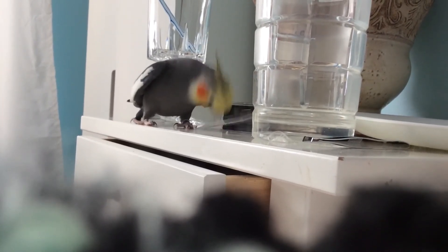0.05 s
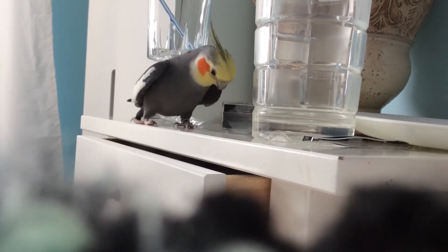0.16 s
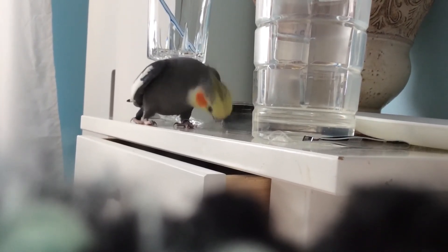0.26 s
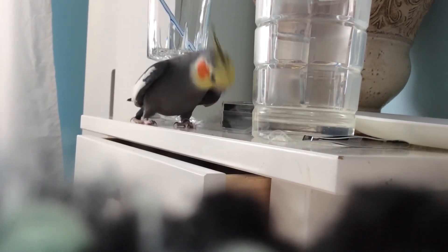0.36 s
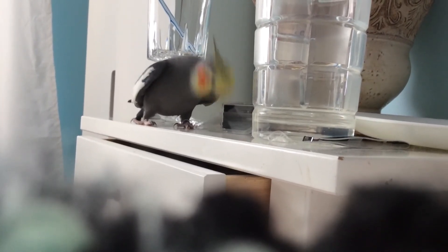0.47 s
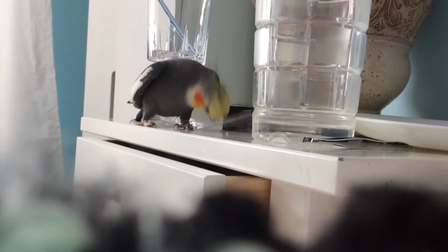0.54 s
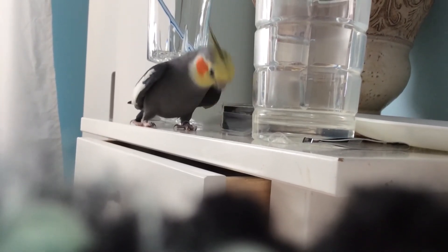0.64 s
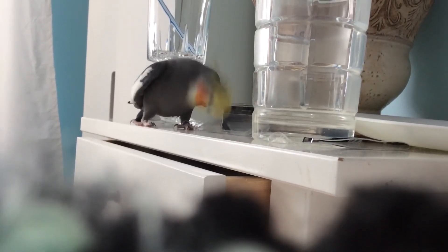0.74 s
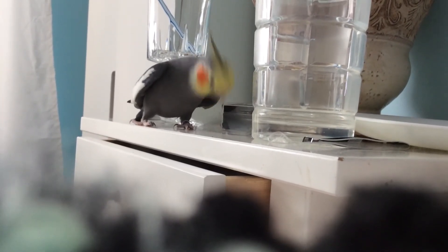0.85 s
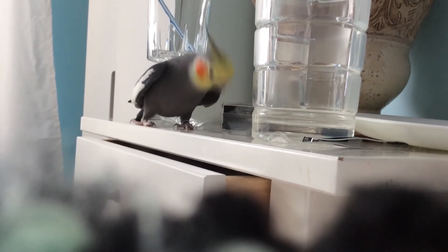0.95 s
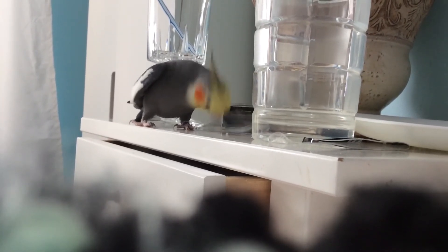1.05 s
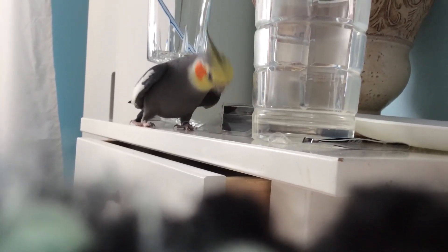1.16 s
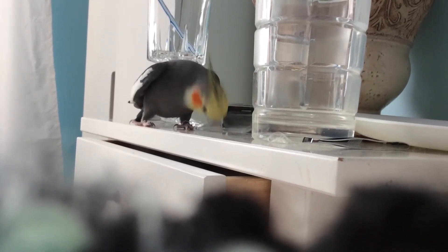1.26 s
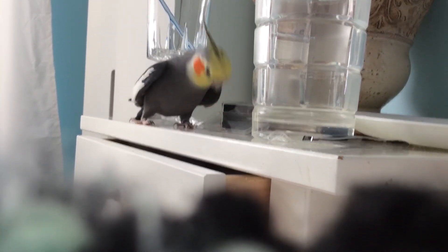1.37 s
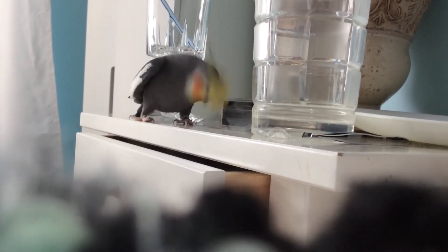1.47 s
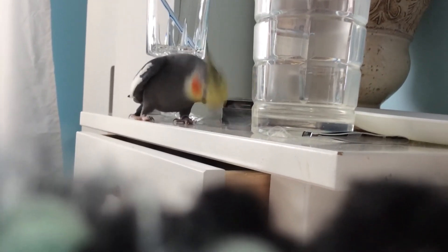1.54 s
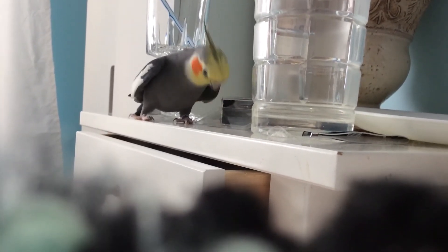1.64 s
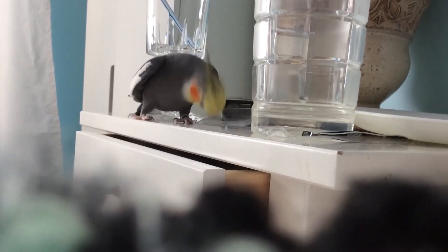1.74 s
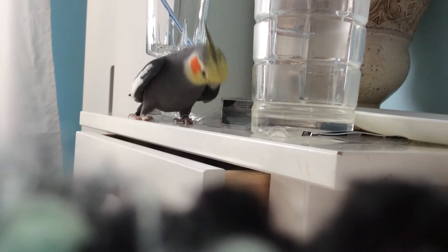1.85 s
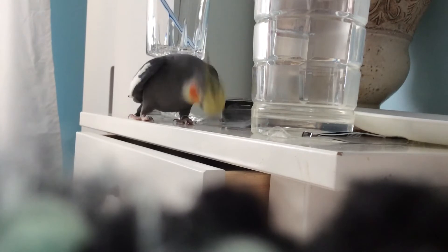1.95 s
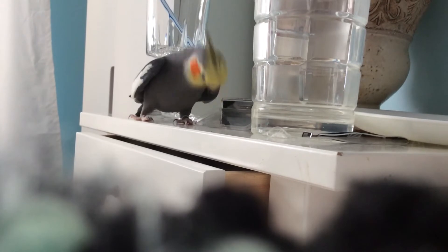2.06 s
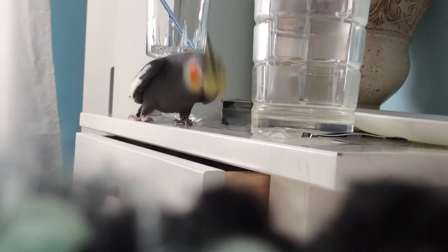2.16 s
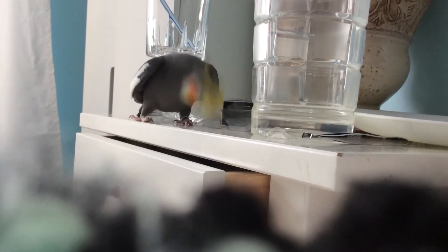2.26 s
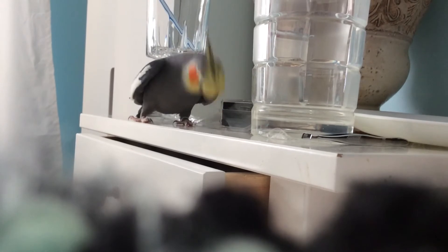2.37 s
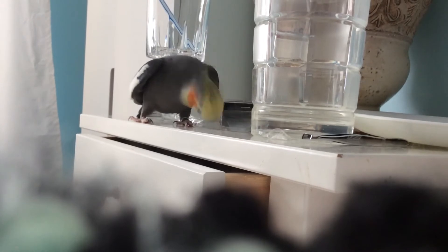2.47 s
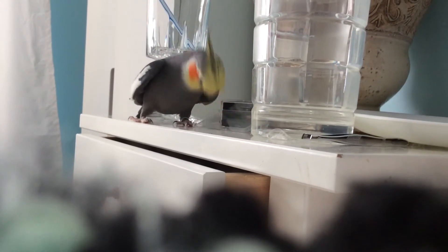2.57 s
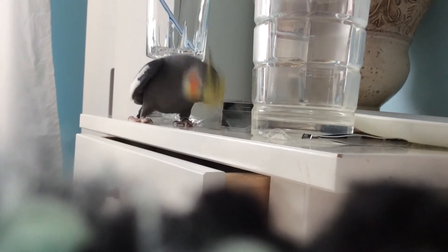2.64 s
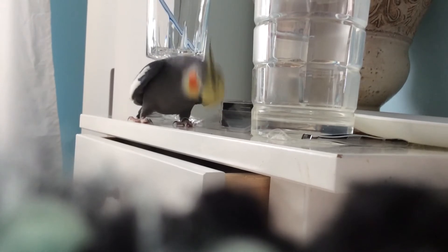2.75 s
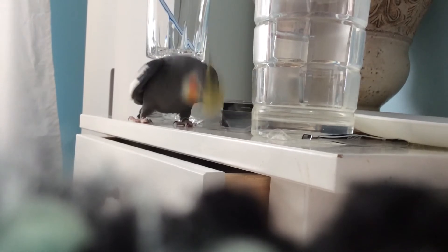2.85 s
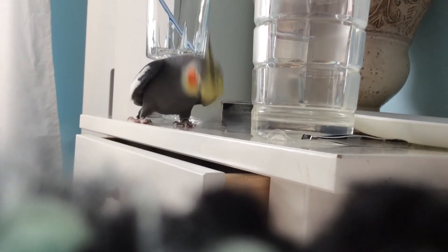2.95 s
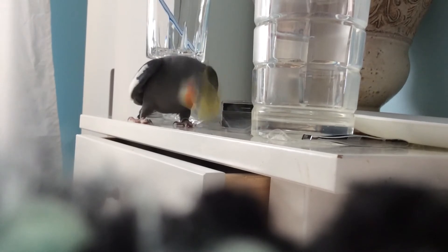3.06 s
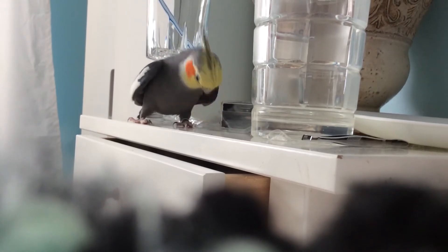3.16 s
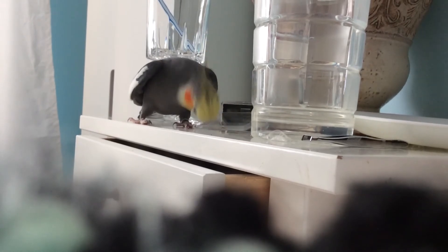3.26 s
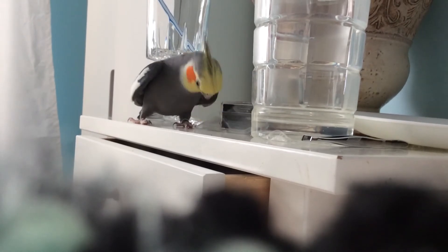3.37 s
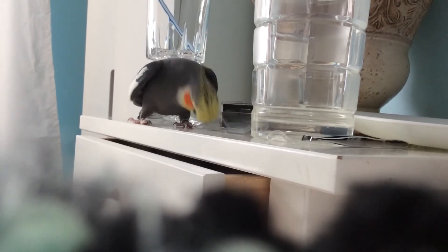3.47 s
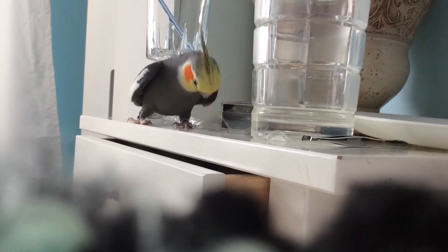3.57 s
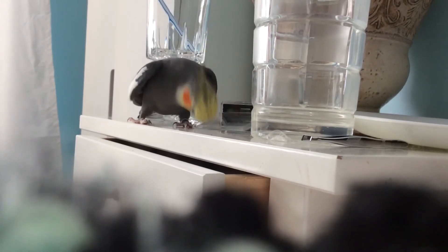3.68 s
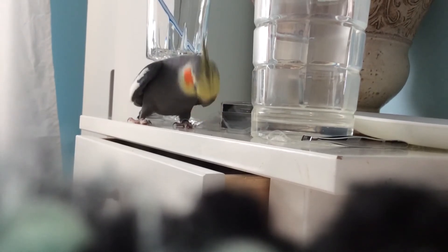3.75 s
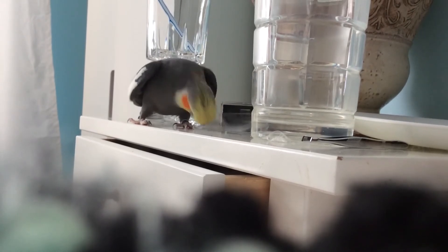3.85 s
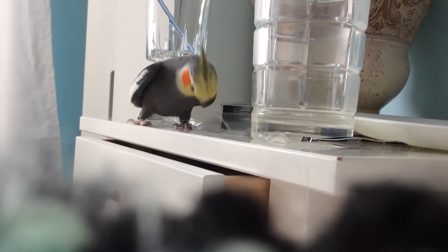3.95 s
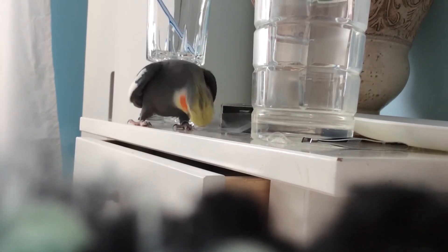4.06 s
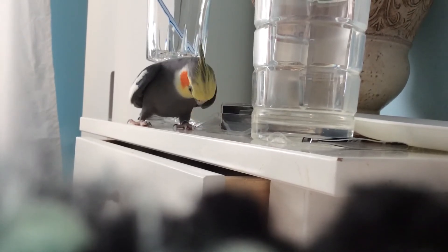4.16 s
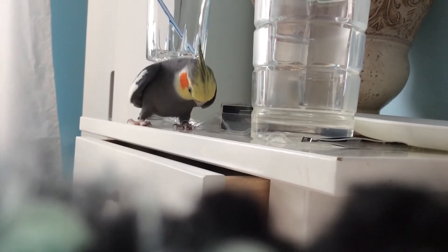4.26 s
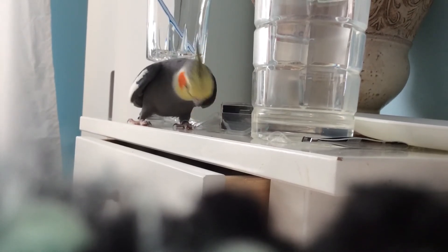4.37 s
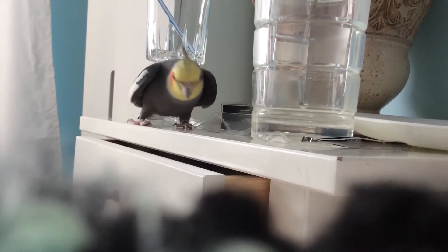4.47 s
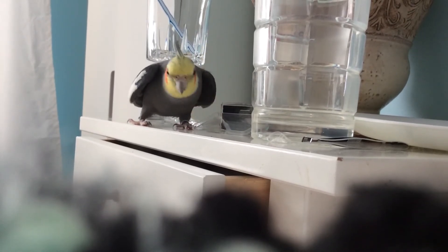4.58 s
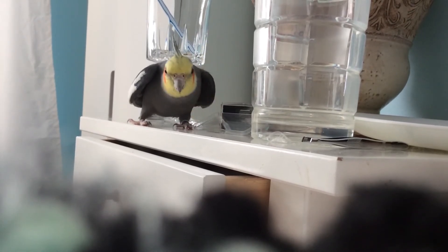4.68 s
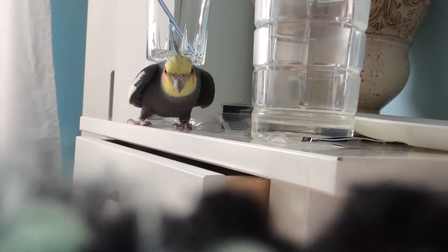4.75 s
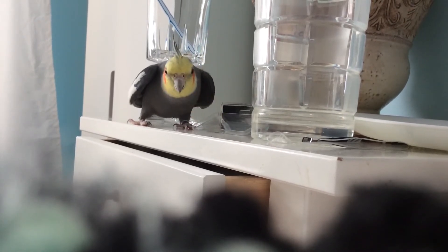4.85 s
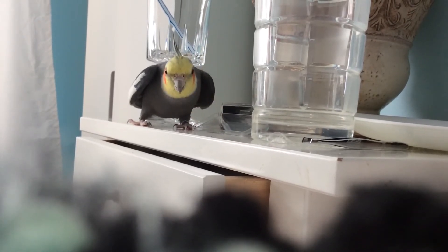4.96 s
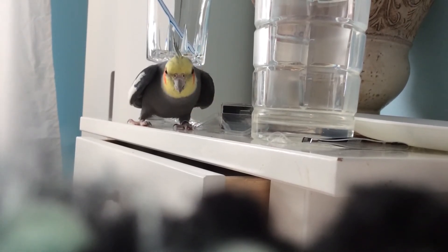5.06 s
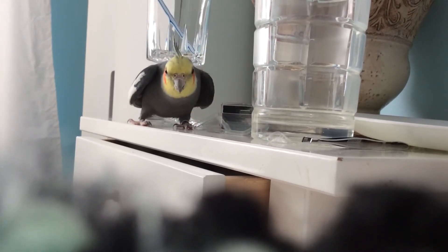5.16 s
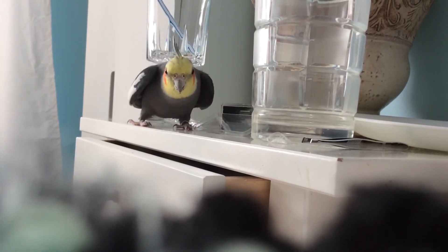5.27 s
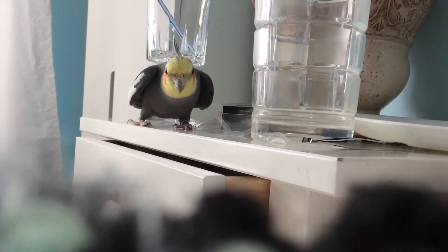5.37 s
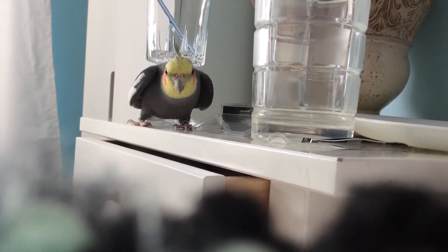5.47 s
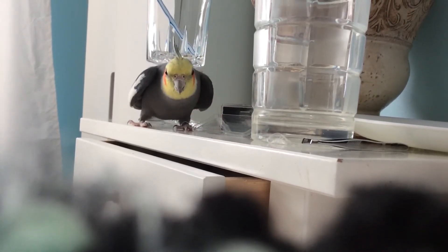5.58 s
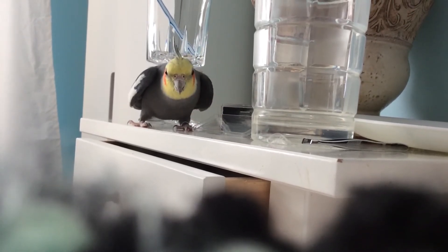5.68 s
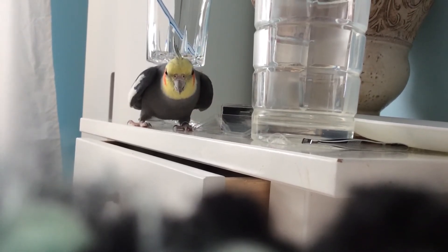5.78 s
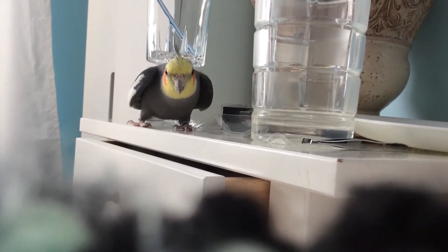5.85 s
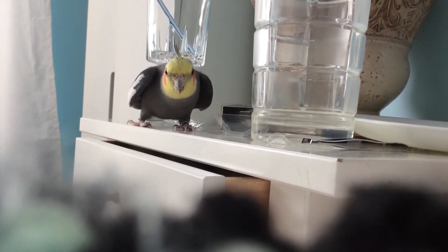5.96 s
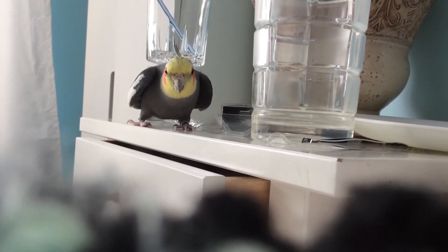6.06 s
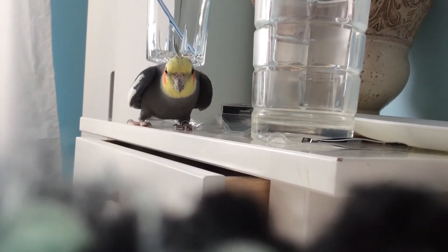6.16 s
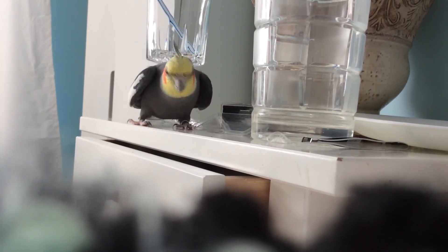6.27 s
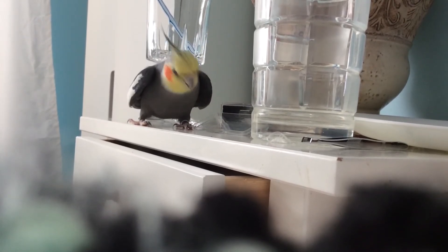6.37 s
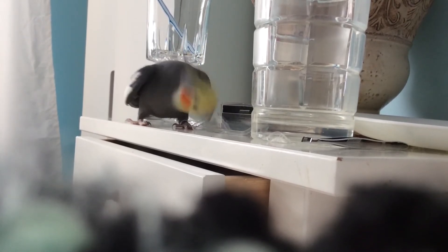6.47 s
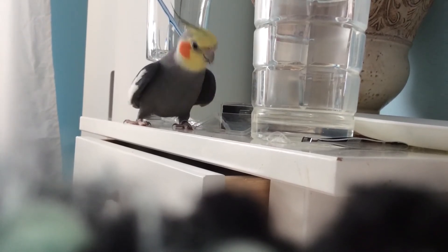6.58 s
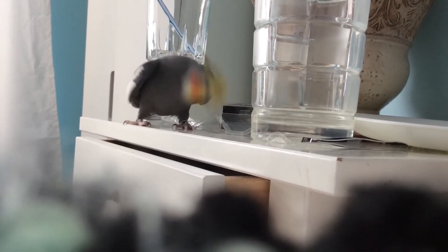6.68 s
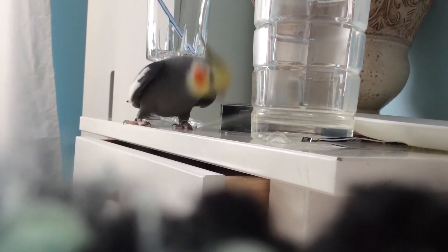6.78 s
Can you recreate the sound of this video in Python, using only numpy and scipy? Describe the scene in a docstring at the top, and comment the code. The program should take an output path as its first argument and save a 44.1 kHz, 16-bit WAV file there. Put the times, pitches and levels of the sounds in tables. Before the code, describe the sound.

A small parrot raps a loose plastic pot on a hollow chest top in steady sharp knocks with rattling rebounds, pauses, then strikes once more over fan hum.

```python
"""First heard are a fan's hum and the last of a plastic buzz; then a small parrot hammers a loose plastic pot
on a hollow chest of drawers. Each blow excites short damped modes: a beak tick, a scrape, and a second knock as
the pot meets the top. The pot buzzes by repeated micro-impacts, rocks back and lands with a modal ring.
Shaped noise gives the faint rustles of the shifting bird and the rush of air, over which fluttering sinusoids
make the motor hum; sparse pings are single wall modes, and a diffuse decaying tail is the room."""
import sys
import numpy as np
from scipy import signal
from scipy.fft import rfft, irfft
from scipy.io import wavfile
from scipy.ndimage import uniform_filter1d

SR = 44100
rng = np.random.default_rng(int(sys.argv[2]) if len(sys.argv) > 2 else 0)


def convert_level_to_amplitude(level_db):
    """Map a level in decibels to its linear amplitude factor."""
    exponent = np.asarray(level_db, float) / 20
    return 10 ** exponent


def waveform_to_disk(signal):
    """Save audio, clipped to [-1, 1], as 16-bit WAV at the path in sys.argv[1]."""
    frames = np.transpose(np.atleast_2d(signal))
    scaled = np.clip(frames, -1, 1) * 32767
    samples = np.round(scaled).astype(np.int16)
    wavfile.write(sys.argv[1], SR, samples)


N = 300762  # length [samples]


def level(x, db):
    """Energy scaling: set the rms level."""
    return x * convert_level_to_amplitude(db) / np.sqrt(np.mean(x ** 2))


def peak(x, db):
    """Amplitude scaling: set the peak level."""
    return x * convert_level_to_amplitude(db) / np.max(np.abs(x))


def add(out, s, x):
    """Linear superposition: mix a short sound in at time s."""
    i = int(s * SR)
    out[i:i + len(x)] += x[:len(out) - i]


def onset(length, rise_s):
    """Finite rise time: a linear swell from 0 to 1."""
    return np.clip(np.arange(length) / SR / rise_s, 0, 1)


def colour(x, points):
    """Linear filtering: gains at (frequency [Hz], gain [dB]) points, joined over log frequency."""
    hz, db = np.transpose(points)
    log_hz = np.log(np.fft.rfftfreq(len(x), 1 / SR) + 1)
    return irfft(rfft(x) * convert_level_to_amplitude(np.interp(log_hz, np.log(hz), db)), len(x))


def walk(rate):
    """Low-pass random process: chance smoothed over 1/rate seconds, standard deviation 1."""
    k = int(SR / rate)
    held = np.repeat(rng.standard_normal(N // k + 1), k)
    smooth = uniform_filter1d(uniform_filter1d(held, k), k)[:N]
    return smooth / smooth.std()


def chatter(length_s, decay_s, spread_db):
    """Repeated micro-impact: contacts of uneven size under an exponential decay."""
    size, unevenness = rng.standard_normal((int(length_s * SR), 2)).T
    decay = np.exp(-np.arange(len(size)) / SR / decay_s)
    return size * convert_level_to_amplitude(spread_db * unevenness) * decay


def ring(modes, length_s, tilt_db=0., scatter_db=0., detune=0.):
    """Modal superposition: damped sinusoids, weighted anew by each contact; tilt is in dB per octave."""
    hz, db, t60 = np.transpose(modes)[:, :, None]
    weight, shift = rng.standard_normal((len(modes), 2)).T[:, :, None]
    t = np.arange(int(length_s * SR)) / SR
    gain = convert_level_to_amplitude(db + tilt_db * np.log2(hz / 3600) + scatter_db * weight)
    decay = np.exp(-np.log(1000) * t / t60)
    return np.sum(gain * decay * np.sin(2 * np.pi * hz * (1 + detune * shift) * t), axis=0)


def radiate(x, low_hz, high_hz):
    """Radiation efficiency: a band limit with second-order edges."""
    return signal.sosfilt(signal.butter(2, [low_hz, high_hz], "band", fs=SR, output="sos"), x)


# beak blows: (time [s], relative strike level [dB], delay of the knock [ms],
# relative knock level [dB], relative boom level [dB])
BEAK_BLOWS = [(0.0927, -11.5, 3.5, -9.5, -50), (0.3362, -10, 4.04, -16, -50.5),
              (0.5795, -11, 3.2, -8.5, -45), (0.8203, -10.5, 4.9, -14, -51.5),
              (1.0739, -13.5, 4.6, -19, -60), (1.3151, -12, 3.75, -18.5, -49),
              (1.5642, -12.5, 3.8, -17, -49.5), (1.782, -10, 3.35, -15, -51.5),
              (1.9826, -10, 3.5, -14, -53), (2.17, -12.5, 2.5, -12.5, -47), (2.355, -11, 2.4, -6.5, -44.5),
              (2.5464, -7.5, 2.64, -10.5, -43), (2.7358, -10.5, 3, -12, -42.5), (2.928, -11, 2.6, -9, -42),
              (3.1189, -9, 2.8, -5.5, -44), (3.3169, -10.5, 2.62, -7.5, -44), (3.5233, -12, 2.33, -13, -43),
              (3.7174, -9.5, 2.44, -11, -39), (3.9002, -13, 4.66, -7.5, -42.5),
              (4.0926, -13, 4.03, -5.5, -42.5), (6.7719, -15.5, 2.6, -17, -60)]
# wandering strike spot: (time [s], relative brightness [dB/octave], boom tilt [dB/octave], tick gain [dB])
STRIKE_SPOT = [(0.1, 0.1, 5.5, 8.5), (0.8, -0.5, -3.5, 8), (1.9, -2, 0.5, 5), (2.55, 3, -10.5, 4),
               (3.25, 1.5, -2, 6), (3.9, 3.5, 17.5, 3), (4.1, 4.5, 9.5, 2), (6.77, 1.5, -1, 6.5)]
# modes of the thin chest top: (frequency [Hz], relative level [dB], t60 [s])
TOP_MODES = [(751, -30.5, 0.0089), (930, -18, 0.016), (1210, -23, .01), (1891, -45.5, 0.0074),
             (2337, -15, 0.038), (2974, 2.5, 0.0071), (3300, -5.5, 0.0087), (3500, -7, 0.0066),
             (4290, 4.5, 0.0077), (5020, -2, 0.011), (6030, 4, 0.0073), (6800, -0.5, .006),
             (7350, -2.5, 0.023), (7830, 0.5, 0.0054), (9500, -4, 0.015), (9900, -13.5, 0.0038),
             (10560, -16, 0.0061), (12037, -37, .004), (15200, -35.5, .004)]
# modes of the hollow chest: (frequency [Hz], relative level [dB], t60 [s])
CHEST_MODES = [(364, 4.5, 0.1), (520, -6.5, 0.079), (538, 0.5, 0.07), (664, -13.5, 0.12),
               (890, -15.5, 0.098)]


def blows():
    """Impact excitation: a tick rings its own fixed modes; scrape and knock drive the top's modes; the hollow
    chest booms under them."""
    pot, chest = np.zeros((2, N))
    scatter_db = 1.8
    spot_s, *spot = np.transpose(STRIKE_SPOT)
    for s, strike_db, delay_ms, knock_db, boom_db in BEAK_BLOWS:
        bright_db, tilt_db, tick_gain_db = (np.interp(s, spot_s, column) for column in spot)
        late = s + delay_ms / 1000
        # the hard beak tip gives a short tick, with the same modes each time
        tick = -ring([(5030, 12.5, 0.0021), (2556, -23.0, .004)], .004)
        add(pot, s, peak(tick, strike_db + tick_gain_db))
        grains = chatter(0.039, 0.0055, 1.8)
        scrape = signal.fftconvolve(grains, ring(TOP_MODES, .03, bright_db - 3.0, scatter_db, 0.013))
        add(pot, s, peak(scrape, strike_db - 0.5))
        grains = chatter(0.013, 0.0034, 0.83)
        knock = signal.fftconvolve(grains, ring(TOP_MODES, .03, bright_db - 0.6, scatter_db, 0.025))
        add(pot, late, peak(knock, knock_db - 3.0))
        # the flat base meets the top at once: a few cycles, duller than the tick
        base_modes = [(2877, -2.5, 0.017), (6340, 0, 0.0079)]
        base = -ring(base_modes, 0.0092, bright_db - 2.5, scatter_db, 0.054)
        add(pot, late, peak(base, knock_db))
        swell = onset(SR // 5, 0.0019)
        boom = swell * ring(CHEST_MODES, 1 / 5, tilt_db, scatter_db, 0.031)
        add(chest, late, peak(boom, boom_db + 9))
    return pot, chest


# the pot rocks back and lands: (time [s], relative impact level [dB], relative hollow-note level [dB])
POT_LANDINGS = [(0.0256, -45, -55), (0.1803, -20, -37.5), (0.189, -15, -35.5), (0.216, -28.5, -41.5),
                (0.2318, -31, -56), (0.4223, -16, -42), (0.429, -21.5, -41), (0.47, -30.5, -47.5),
                (0.513, -49, -60), (0.6808, -14.5, -32.5), (0.7367, -26, -47), (0.9047, -20, -42),
                (0.909, -18, -39.5), (0.946, -26.5, -45), (1.0169, -40.5, -56.5), (1.137, -26, -44),
                (1.1665, -25.5, -49.5), (1.187, -51, -67), (1.3696, -29, -45.5), (1.3989, -37.5, -62),
                (1.6154, -26.5, -42.5), (1.648, -39.5, -61), (1.8407, -28, -42), (1.8668, -31.5, -53.5),
                (2.037, -27, -43.5), (2.061, -29, -46.5), (2.2321, -22, -37.5), (2.249, -32, -41),
                (2.2636, -32, -53.5), (2.4212, -22, -41), (2.4394, -39, -46), (2.6099, -19.5, -48),
                (2.6385, -35, -55), (2.6485, -36.5, -54.5), (2.8031, -22, -35.5), (2.8419, -34, -57),
                (3.012, -18, -37), (3.0615, -26, -56.5), (3.1941, -17.5, -42.5), (3.2013, -19.5, -35.5),
                (3.2387, -38, -53.5), (3.37, -27, -45.5), (3.417, -44, -54.5), (3.5498, -32.5, -45),
                (3.577, -36.5, -48), (3.772, -26, -41), (3.809, -36, -55), (3.957, -30.5, -51.5),
                (3.9907, -29.5, -61.5), (4.132, -20, -42), (4.152, -27.5, -39), (4.1848, -32.5, -49)]
# modes of the free pot, those under 1800 Hz its hollow note: (frequency [Hz], relative level [dB], t60 [s])
FREE_POT_MODES = [(1509, -19, 0.17), (1655, -26, 0.23), (934, -13, 0.046), (2723, -1, 0.057),
                  (3193, -2, .03), (3290, -12.5, .03), (4726, -4.5, .03), (5300, -7.5, 0.0083),
                  (5880, -2, 0.03), (6250, -5, 0.019), (7500, -10, 0.03), (9600, -13, 0.027),
                  (11730, -22.5, 0.041)]


def landings():
    """Contact damping: the rim clacks, the pot rings until a later contact chokes it, the chest thumps."""
    out, chest = np.zeros((2, N))
    swell_s, hold_s = .01, .018  # of the rolling rim
    hollow_modes = [m for m in FREE_POT_MODES if m[0] < 1800]
    wall_modes = [m for m in FREE_POT_MODES if m[0] > 1800]
    contacts = np.sort([row[0] for row in BEAK_BLOWS + POT_LANDINGS] + [N / SR])
    for s, impact_db, hollow_db in POT_LANDINGS:
        # a harder landing rings brighter, in dB per octave
        bright_db = -0.9 + 0.35 * (impact_db + 27)
        hollow = ring(hollow_modes, 1 / 5, 0., 3.5, 0.002)
        hollow = peak(hollow * onset(len(hollow), 0.0013), hollow_db + 6)
        wall = signal.fftconvolve(chatter(.01, 0.0025, 4.5), ring(wall_modes, 1 / 5, bright_db, 3.5, 0.008))
        wall = peak(wall[:len(hollow)], impact_db - 1.5)
        # contacts within 12 ms do not choke the ring
        after_s = np.arange(len(hollow)) / SR + s - contacts[contacts > s + .012][0]
        choke = np.exp(-np.clip(after_s, 0, 1) / .004)
        add(out, s, (hollow + wall) * choke)
        clack = radiate(chatter(0.044, 0.0075, 3.076), 1500, 15000)
        add(out, s, peak(clack, impact_db - 7))
        rim_touch = radiate(chatter(.006, 0.00094, 2.), 1800, 14000)
        add(out, s, peak(rim_touch, impact_db - 4.5))
        # the rim grinds round its edge, swelling before the landing and held after it
        t = np.arange(SR // 10) / SR - swell_s
        roll = radiate(chatter(1 / 10, 1e3, 3.), 2200, 9500)
        roll = roll * np.clip(1 + t / swell_s, 0, 1) * np.exp(-np.clip(t - hold_s, 0, 1) / .004)
        add(out, s - swell_s, convert_level_to_amplitude(impact_db - 24.5) * roll)
        thump = onset(SR // 5, 0.0017) * ring(CHEST_MODES, 1 / 5, 6., 4.8, 0.045)
        add(chest, s, peak(thump, impact_db - 25))
    return out, chest


# spectrum of the buzz: (frequency [Hz], relative density [dB])
BUZZ_SPECTRUM = [(900, -31), (1600, -18.5), (2300, -4), (2500, -1), (2650, 0), (2800, -7), (3400, -7.5),
                 (4700, -10.5), (6200, -15), (9600, -17), (15000, -42.5)]
# the pot still buzzes from an earlier blow: (relative level [dB], time until it stops [s])
FIRST_BUZZ = (-56, 0.055)


def buzz():
    """Intermittent contact: micro-impacts fade slowly, then stop once the pot has landed for the last time."""
    grain = level(colour(chatter(N / SR, 1e9, 7.), BUZZ_SPECTRUM), 0)
    gain, t = np.zeros(N), np.arange(SR // 2) / SR
    starts = [row[0] for row in BEAK_BLOWS]
    landed = np.transpose(POT_LANDINGS)[0]
    bouts = [(0, *FIRST_BUZZ)]
    for s, next_s in zip(starts, starts[1:] + [N / SR]):
        rocking = landed[(landed > s) & (landed < min(next_s, s + 1 / 4))]
        # the pot settles 12 ms after its last landing
        length_s = rocking[-1] - s + .012 if len(rocking) else 1
        # stronger as the hammering goes on, up to a ceiling
        bouts.append((s, min(-48.5 + 1.76 * s, -44), length_s))
    for s, db, length_s in bouts:
        fade = np.exp(-t / .12 - np.clip(t - length_s, 0, 1) / 0.014)
        add(gain, s, convert_level_to_amplitude(db) * fade)
    return grain * gain * convert_level_to_amplitude(3.0 * walk(100))


# faint pings of the resting pot as the bird shifts: (time [s], frequency [Hz], relative level [dB])
POT_PINGS = [(6.163, 3300, -69), (6.358, 2686, -65.5)]


def pings():
    """Selective excitation: a soft touch rings one wall mode alone."""
    out = np.zeros(N)
    for s, hz, db in POT_PINGS:
        ping = onset(SR // 5, .005) * ring([(hz, 0, .07)], 1 / 5)
        add(out, s, peak(ping, db))
    return out


# rustles of the bird: (time [s], relative level [dB], decay time constant [s])
BIRD_RUSTLES = [(4.325, -71, 0.066), (5.756, -81.5, 0.061), (5.979, -79, 0.1), (6.053, -83.5, 0.12),
                (6.128, -80.5, .08)]


def rustles():
    """Friction noise: soft brushing that swells quickly and decays."""
    out = np.zeros(N)
    spectrum = [(800, -20), (2000, -4.5), (3500, 0.0), (8000, -7.0), (13000, -16)]
    for s, db, decay_s in BIRD_RUSTLES:
        brush = chatter(0.47, decay_s, 2.8)
        brush = brush * onset(len(brush), .012)
        add(out, s, level(colour(brush, spectrum), db))
    return out


def room(x):
    """Reverberant decay: a diffuse exponential tail whose treble dies sooner."""
    t = np.arange(SR // 2) / SR
    t60_s, treble_t60_s = 0.45, 0.046
    low = colour(rng.standard_normal(len(t)), [(1500, -1.5), (2500, -1.5), (7000, -9.0)])
    low = low * np.exp(-np.log(1000) * t / t60_s)
    high = colour(rng.standard_normal(len(t)), [(2500, -13), (7000, -3.5)])
    high = high * np.exp(-np.log(1000) * t / treble_t60_s)
    tail = (low + high) * np.clip(t / 0.007, 0, 1)
    tail = tail / np.sqrt(np.sum(tail ** 2))  # unit energy
    return x + convert_level_to_amplitude(-21) * signal.fftconvolve(x, tail)[:N]


# motor lines: (frequency [Hz], relative rms level [dB], flutter rate [1/s],
# steady amplitude against the spread of each flutter component [ratio])
MOTOR_LINES = [(69, -55.5, 27, 1.16), (120.9, -51.5, 38, 4.9), (349.7, -65.5, 33, 0.44),
               (470.5, -73.5, 45, 0.21), (591, -70.5, 11, 1.63)]
# spectrum of the rush of air: (frequency [Hz], relative density [dB])
AIR_SPECTRUM = [(20, -47), (40, -27), (56, -24.5), (66, -11), (110, -11), (135, -18.5), (300, -26.5),
                (640, -32.5), (1300, -44), (2000, -48.5), (4000, -54.5), (7000, -57.5), (9000, -52.5),
                (12000, -64), (17000, -70.5)]


def fan():
    """Tonal and broadband flow noise: randomly modulated motor lines over the rush of air."""
    out = level(colour(rng.standard_normal(N), AIR_SPECTRUM), -52)
    t = np.arange(N) / SR
    for hz, db, rate, steady in MOTOR_LINES:
        flutter = steady + walk(rate) + 1j * walk(rate)
        line = np.real(flutter * np.exp(2j * np.pi * hz * t))
        out = out + level(line, db)
    return out


def scene():
    """Superposition of sources: bird and pot in the room, over the fan; the small pot radiates little bass."""
    pot, chest = blows()
    rim, thumps = landings()
    pot = radiate(pot + rim + buzz() + pings(), 1380, 14000)
    return (room(pot + chest + thumps + rustles()) + fan())[None]


def roll_off(x):
    """The treble ends steeply here."""
    return signal.sosfilt(signal.butter(12, 16990, fs=SR, output="sos"), x)


# microphone response: (frequency [Hz], gain [dB])
MIC_RESPONSE = [(35, -3), (55, -1), (65, 0), (11000, 0), (13500, -3), (16500, -6.5)]


def record(dry):
    """Transduction and saturation: the microphone thins both ends, the input stage rounds the loudest peaks."""
    heard = colour(dry[0], MIC_RESPONSE)[None]
    mix = np.tanh(1.285 * heard) / 1.293
    return roll_off(mix)


dry = scene()
out = record(dry)
waveform_to_disk(out)
```